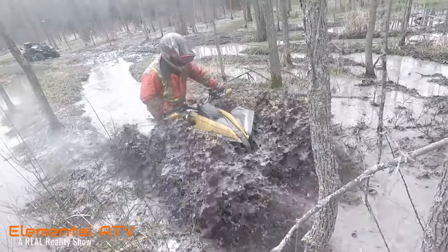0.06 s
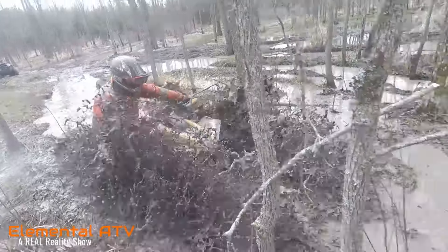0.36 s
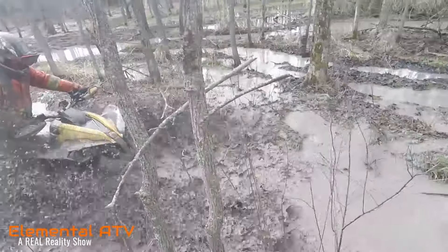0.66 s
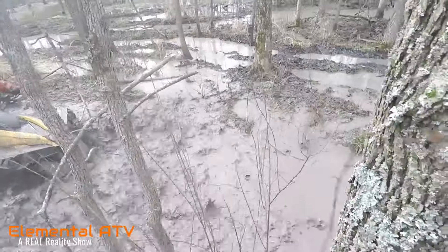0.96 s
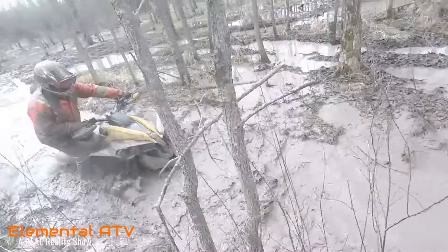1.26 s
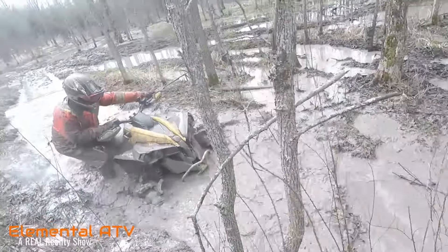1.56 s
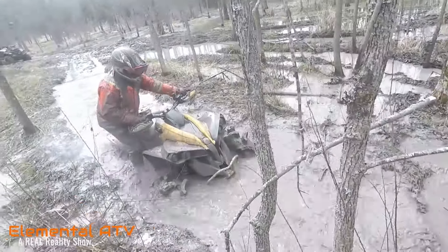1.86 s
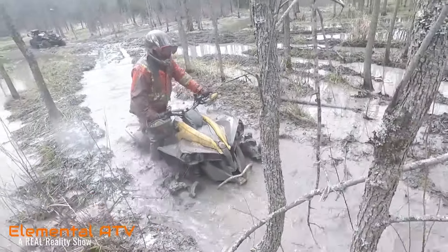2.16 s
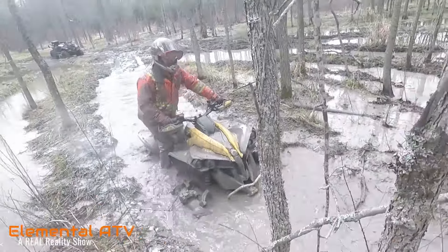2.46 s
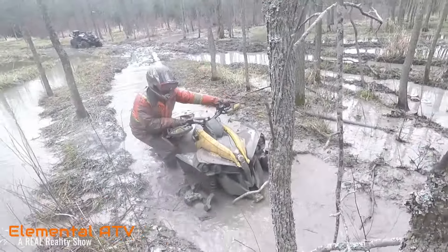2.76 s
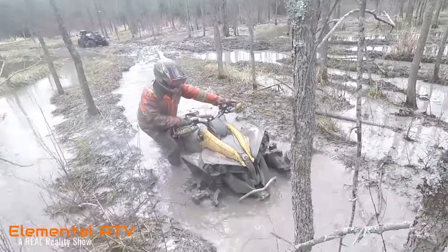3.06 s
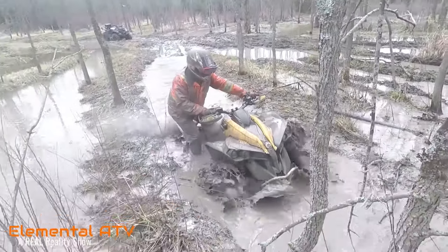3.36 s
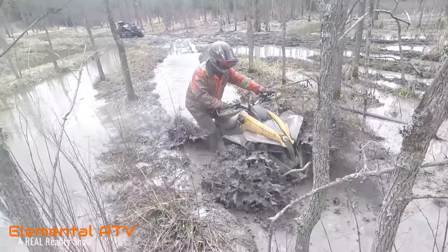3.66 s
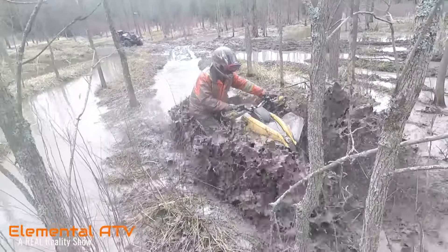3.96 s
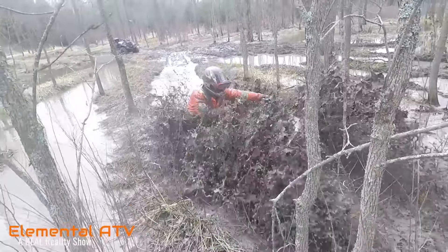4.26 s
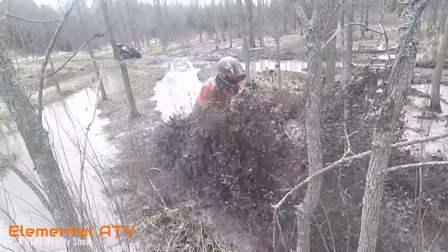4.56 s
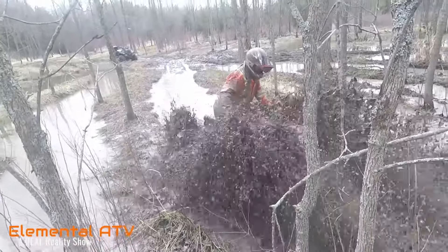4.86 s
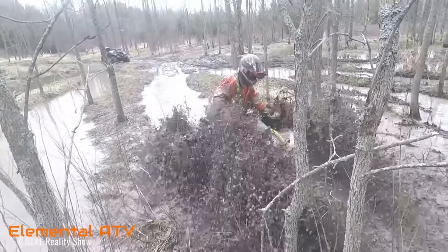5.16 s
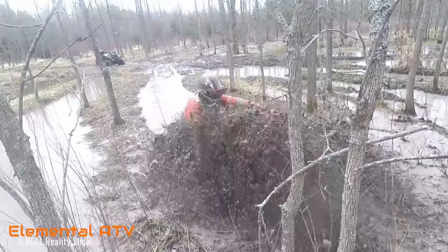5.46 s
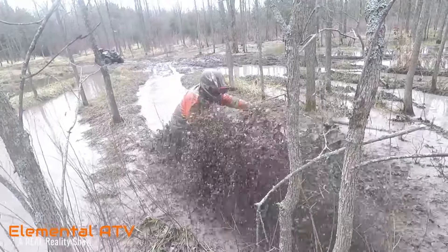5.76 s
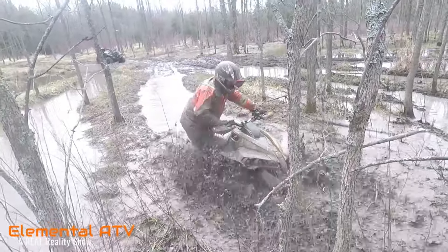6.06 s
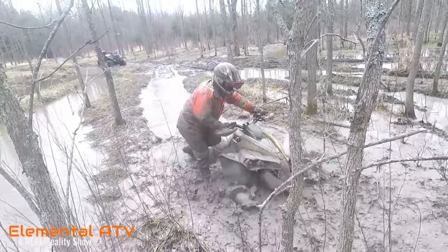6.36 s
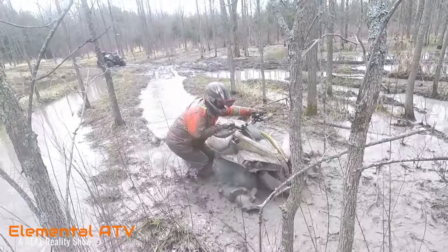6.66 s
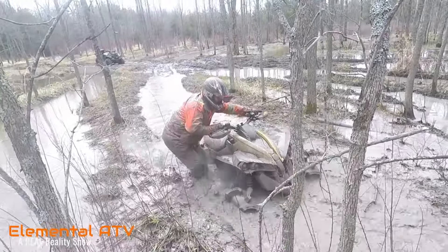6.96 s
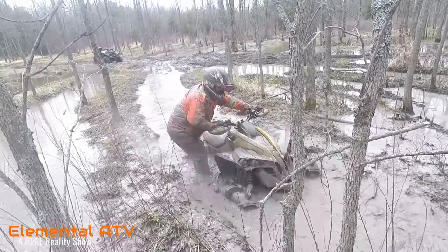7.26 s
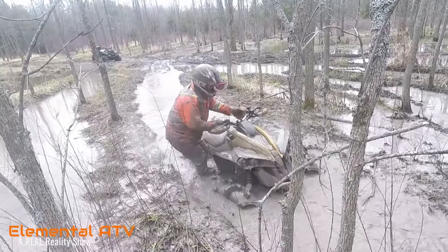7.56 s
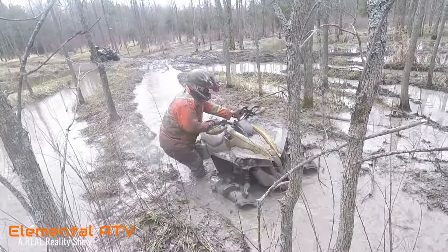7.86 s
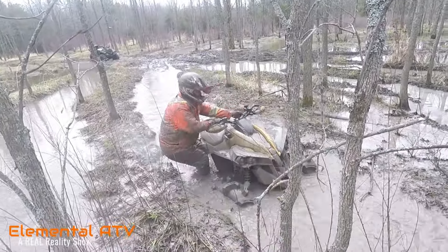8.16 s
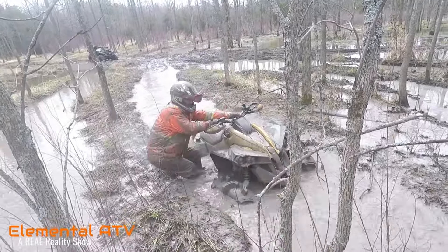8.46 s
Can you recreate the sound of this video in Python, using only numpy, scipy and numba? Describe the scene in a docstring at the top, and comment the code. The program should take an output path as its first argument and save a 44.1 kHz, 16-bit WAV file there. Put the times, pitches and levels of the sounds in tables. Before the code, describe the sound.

Heard from the edge of a mud hole in the woods, a quad's deep engine winds down amid falling spray. Another quad nearby gives a raspy rev with exhaust pops, followed by cracking twigs. The first quad roars up again and strains as its spinning tyres throw thick mud and water. The throttle shuts, the splatter dies away, something knocks on a plastic panel, and the engine chugs unevenly over trickling water.

```python
"""A V-twin quad, stuck in a mud hole in the woods, drops from a rev, idles, revs hard and idles again.
Uneven intake gulps and exhaust puffs excite the resonances of its pipes, airbox and engine cases.
Its spinning tyres fling mud and water, which patter down as countless small impacts.
A second quad close by revs, pops and runs down early on; twigs snap and something knocks on the bodywork."""
import sys
import numpy as np
from scipy import signal
from scipy.fft import rfft, irfft, next_fast_len
from scipy.io import wavfile
from scipy.ndimage import uniform_filter1d
from numba import njit

SR = 44100
rng = np.random.default_rng(int(sys.argv[2]) if len(sys.argv) > 2 else 0)


def unload_audio(sound):
    """Save the sound as a 16-bit wav file, at the path given as the first command line argument."""
    columns = np.transpose(np.atleast_2d(sound))
    # keep every value between -1 and 1, then stretch to whole-number steps
    steps = np.round(np.clip(columns, -1, 1) * 32767)
    wavfile.write(sys.argv[1], SR, steps.astype(np.int16))


N = 375291
TIME = np.arange(N) / SR

# Revs of the stuck quad, the first already under way:
# throttle opens t/s, shuts t/s, speed hangs on t/s, fast idle f/Hz, kept for t/s, settled idle f/Hz
THROTTLE_EVENTS = [(-1.5, .02, .025, 12.52, 1.475, 11.17), (3.085, 5.455, .008, 13.62, 1.092, 11.69)]
# Pipe modes of the second quad: f/Hz, bandwidth/Hz, level/dB
SECOND_PIPE_MODES = [(150, 23, -19), (242, 20, -17), (320.4, 36, 21.5), (360, 220, 14), (475, 36, -10),
                     (490, 61, 1.5)]
# Spectrum of a drop's impact or a twig's crack: f/Hz, relative level/dB
CRACK_SPECTRUM = [(500, 9), (2500, 1), (5000, 14.5), (6500, 11), (10000, 6), (15000, -11)]


def stuck_quad():
    """Source and filter: intake and exhaust pulse trains, locked to the crank, drive the resonators."""
    hz = cycle_rate()
    load, throttle, strength_db, roar_gain = effort()
    phase = np.cumsum(hz) / SR
    rough = np.minimum(12 / hz, 1) ** 0.68  # a slow crank turns unevenly
    lag_hz = 59.3 - hz  # grows as the mud drags the engine down
    gulps = firings(phase, start=.013, second=.6, scatter_db=.5, jitter_s=.0002, rough=rough)
    blows = firings(phase, start=.533, second=.51, scatter_db=3.5, jitter_s=.0016, rough=rough)
    return (pipes(gulps, blows, hz, lag_hz, load, throttle) * undb(strength_db)
            + bark(gulps, load) + strain(gulps, lag_hz, load) + gas_roar(gulps) * roar_gain
            + case_clatter(blows, roar_gain) + valve_gear(phase, gulps, rough))


def cycle_rate():
    """The four-stroke cycle rate in Hz sets the fundamental: it picks up, pulls, runs down and settles."""
    # Speed while the tyres drag in the mud, one curve a rev: t/s, cycle rate f/Hz
    loaded_speeds = [
        [(0, 51), (.045, 49.5)],
        [(3.2, 25.8), (3.45, 43.7), (3.55, 49.6), (3.65, 53.7), (3.75, 55.7), (4.2, 54), (4.62, 51.9),
         (4.77, 52.5), (5.15, 48.7), (5.45, 43.6)],
    ]
    pick_up_s, run_down_s, settle_s = .11, .55, .5
    hz = 0
    for (opens, shuts, hang_s, fast_hz, fast_s, idle_hz), pull in zip(THROTTLE_EVENTS, loaded_speeds):
        idle = fast_hz + (idle_hz - fast_hz) * ramp(shuts + hang_s + fast_s, settle_s)
        momentum = (1 - ramp(shuts + hang_s, run_down_s)) ** 1.4
        rev = idle + (curves(pull)[0] - idle) * momentum
        hz = hz + (rev - hz) * ramp(opens, pick_up_s)
    return hz


def effort():
    """Air supply governs excitation: returns load 0-1, throttle 0-1, pulse level in dB and roar gain."""
    open_s, shut_s, kick_s = .38, .056, .099
    load = starved = kick_db = surge = 0
    for opens, shuts, hang_s, *_ in THROTTLE_EVENTS:
        load += ramp(opens, open_s) * (1 - ramp(shuts, shut_s))
        starved += np.exp(-((TIME - shuts - hang_s - .51) / .35) ** 2)  # short of air while running down
        # each move of the throttle gives a few hard pulses
        kick_db += 5 * swell(opens, shut_s, 0, kick_s) + 1.5 * swell(shuts, shut_s, 0, kick_s)
        surge += swell(opens, attack_s=.3, hold_s=.052, release_s=.14)
    throttle = np.clip(.1 * (1 - starved) * (1 - load) + .46 * load, 0, 1)
    strength_db = kick_db - 6 * load - 6 * starved
    roar_gain = undb(-18) * surge + undb(-41.5) * load + undb(-42)
    return load, throttle, strength_db, roar_gain


def pipes(gulps, blows, hz, lag_hz, load, throttle):
    """Air-column resonance: the pipes ring at idle; an open throttle lets the airbox boom instead."""
    # Modes of the shut intake, the exhaust and the open airbox: f/Hz, bandwidth/Hz, level/dB
    intake_modes = [(60.26, 4.83, -15), (136.3, 42.6, -23.5), (197, 3.3, -41), (240.9, 15.7, -13),
                    (280.5, 17, -19.5), (385.2, 7.9, -13.5)]
    exhaust_modes = [(165.24, 14.2, -16.5), (174.4, 48, -16.5)]
    airbox_modes = [(56.3, 4.3, -26.5), (99.6, 20, -18), (172, 92, -10), (202.3, 34.9, -0.5),
                    (242.3, 24.8, -6), (282.9, 29.2, -14), (323, 35.5, -19)]
    idle = ring(blows, exhaust_modes, -.87) - ring(gulps, intake_modes)
    idle = lowpass(idle, np.full(N, 128.), damping=.77)
    idle = lowpass(idle, np.full(N, 203.), damping=.78)  # silencer
    boom = dull(ring(gulps, airbox_modes[3:], -1.036) - ring(gulps, airbox_modes[:3]), hz=352)
    boom_db = 59 + .13 * load * np.clip(lag_hz, 0, 8)
    opening = np.clip(throttle + .0055 * (hz - 12), 0, 1)  # a fast engine draws air past a shut throttle
    return (1 - opening) * idle * undb(65) + opening * boom * undb(boom_db)


def bark(gulps, load):
    """Impulse excitation of the upper airbox modes gives a hard bark when the throttle is open."""
    # Upper modes: f/Hz, bandwidth/Hz, level/dB
    bark_modes = [(374, 30, -16), (468, 32, -20), (616, 25, -1), (1005, 89, 3), (1160, 150, 0.5),
                  (1233, 64, 8), (1455, 330, -2.5), (2120, 1500, -16), (3670, 700, -22)]
    # Course of the bark under load: t/s, relative level/dB
    bark_levels = [(3.15, -34), (3.36, -37), (3.6, -36), (3.83, -32.5), (4.0, -37), (4.17, -42.5),
                   (4.6, -45), (5.2, -41), (5.45, -44)]
    ringing = ring(gulps + .015 * puffs(gulps, decay_s=.005), bark_modes, -1)
    gain = undb(-64) + load * undb(curves(bark_levels)[0] + 4)
    return steady(dull(ringing, hz=7000)) * gain


def strain(gulps, lag_hz, load):
    """Forced resonance: under load the pipe picks out clean, wavering overtones, louder as speed falls."""
    # Pipe modes: f/Hz, bandwidth/Hz, level/dB
    overtone_modes = [(412, 33, -3), (615, 56, 7.5), (720, 40, -22.5)]
    overtones = steady(dull(ring(gulps, overtone_modes, -1.3), hz=875))
    return overtones * load * undb(-39 + .1 * lag_hz - 2.5 * walk(3.7))


def gas_roar(gulps):
    """Flow noise: gas rushing with each gulp is filtered by two pipe resonances."""
    rush = puffs(gulps, decay_s=.072)
    return steady(dull(ring(rush, [(328, 45, 7.3), (434, 81, -2)]), hz=810))


def case_clatter(blows, roar_gain):
    """Structural resonance: the engine cases ring in step with the crank, harder at pick-up."""
    # Case modes: f/Hz, bandwidth/Hz, level/dB
    case_modes = [(1686, 91, 2), (2495, 110, -1.5), (3290, 130, -2.5), (3860, 130, -5.5)]
    return unit(ring(puffs(blows, decay_s=.0051), case_modes)) * (undb(-52.5) + .068 * roar_gain)


def valve_gear(phase, gulps, rough):
    """Impact noise: tappets tap sharply and unevenly, and the valve gear ticks with each gulp."""
    # Spectrum of a tick: f/Hz, relative level/dB
    tick_spectrum = [(1000, -44), (4500, 1.5), (6600, 7), (8000, -3), (10000, -3), (15000, -31)]
    strikes = firings(phase, start=.2, second=.56, scatter_db=5, jitter_s=.003)
    taps = colour(puffs(strikes * rough, decay_s=.0078), tick_spectrum)
    ticks = colour(puffs(gulps * rough, decay_s=.017), tick_spectrum)
    return taps * undb(-58) + ticks * undb(-55)


def second_quad():
    """Direct and scattered sound: a pipe rings and rasps; off throttle it comes mostly through trees."""
    # Engine speed: t/s, cycle rate f/Hz
    speed = [(0, 15), (.33, 26), (.45, 28.3), (.7, 28.5), (.95, 29.5), (1.6, 29.5), (2, 24), (2.7, 16.5),
             (3.2, 13)]
    # Blip, rev and run-down: start t/s, attack t/s, hold t/s, release t/s, pipe level/dB, rasp level/dB
    runs = [(.1, .25, .1, .3, -21, -42), (1.07, .09, .44, .07, -19, -26.5), (1.6, .35, .55, .7, -23.5, -47)]
    # Spectrum of the escaping gas: f/Hz, relative level/dB
    rasp_spectrum = [(200, -12), (700, -23), (1100, 0.5), (1550, 0.5), (2250, 0), (2800, -20), (5000, -10),
                     (8500, -24), (10500, -50), (15000, -63)]
    pipe_db, rasp_db = swells(runs)
    phase = np.cumsum(curves(speed)[0]) / SR
    phase -= np.interp(1.453, TIME, phase)  # one firing falls at this time
    pulses = firings(phase, start=0, second=.3, scatter_db=.7, jitter_s=.00004)
    rasp = steady(colour(puffs(pulses, decay_s=.022), rasp_spectrum))
    pipe = dull(ring(pulses, SECOND_PIPE_MODES), hz=527)
    crack = dull(ring(pulses, [(1530, 120, 0)]), hz=2170)
    muffled = dull(pipe, hz=480)
    distant = steady(muffled + 1.4 * trees(muffled, decay_s=.054))
    direct_share = np.clip((rasp_db + 46) / 17, 0, 1)
    tone = direct_share * steady(pipe + crack) + (1 - direct_share) * distant
    return tone * undb(pipe_db - 1.5) + rasp * undb(rasp_db - 1.8)


def exhaust_pops():
    """Impulse response: bangs in the second quad's exhaust pop in broad modes and thump in its pipe."""
    # Bangs: t/s, impulse level/dB
    bang_events = [(.969, -20), (1.002, -9), (1.036, -10), (1.07, -10.5), (1.099, -18), (1.133, -19),
                   (1.153, -10), (1.167, -13), (1.408, -9), (1.421, -12)]
    s, db = np.transpose(bang_events)
    bangs = clicks(s, undb(db))
    bursts = bangs + .085 * puffs(bangs, decay_s=.0033)
    pops = ring(bursts, [(404, 180, 31.4), (1250, 600, 24), (1580, 240, 25)], -1.35)
    thumps = ring(bangs, SECOND_PIPE_MODES)
    return dull(pops, hz=2210) + dull(thumps, hz=540) * undb(24.5)


def mud():
    """Superposed random impacts: tyres churn thick mud; thrown water falls as spray and single drops."""
    # Throws: start t/s, attack t/s, hold t/s, release t/s, spray level/dB, churn level/dB
    throws = [(-.15, 0.61, 0.18, 0.12, -36.5, -28), (.55, 0.23, 0.069, 0.16, -32.5, -25),
              (.93, 0.019, 0.67, 0.16, -50, -26), (2.26, 0.031, 0.18, 0.13, -46, -34),
              (2.58, 0.013, 0.0063, 0.023, -37.5, -31.5), (3.08, 0.027, 0.37, 0.082, -38, -29.5),
              (3.15, 0.6, 0.12, 0.26, -44, -28.5), (4.0, 0.85, 1.47, 0.27, -36.5, -29.5),
              (5.8, 0.26, 0.14, 0.22, -33, -26), (6.3, 0.26, 0.38, 0.34, -50.5, -36.5)]
    # Spectra of fine spray and thick mud: f/Hz, relative level/dB
    spray_spectrum = [(1200, -27), (2200, -9), (2550, 3.5), (2900, -9), (3600, 0.5), (3950, 4), (4400, 1),
                      (6300, 1.5), (7500, -17), (9200, -13), (11200, -34), (13000, -17.5), (15500, -32.5)]
    churn_spectrum = [(30, 4), (250, 10.5), (500, -3), (750, -10.5), (1050, -2.5), (1300, -0.5), (1700, -1),
                      (2150, -9.5), (2600, -9.5), (2900, -11.5), (4000, -12), (8000, -30.5), (15000, -53)]
    trickle_spray_db, trickle_churn_db = -52.5, -37  # water never stops running off the quad
    spray_db, churn_db = swells(throws)
    spray = colour(patter(count=24000, spread_db=6, decay_s=.01), spray_spectrum)
    churn = colour(patter(count=9000, spread_db=-6.5, decay_s=.017), churn_spectrum)
    drips = colour(patter(count=260, spread_db=3.5, decay_s=.001), CRACK_SPECTRUM)
    spray_gain = np.hypot(undb(spray_db - .74 + .1 * walk(54)), undb(trickle_spray_db))
    churn_gain = np.hypot(undb(churn_db + 1.23 * walk(6.2)), undb(trickle_churn_db))
    return spray * spray_gain + churn * churn_gain + drips * undb(-66)


def twigs():
    """Brittle fracture: dry twigs give broadband cracks that scatter among the trees."""
    # Fractures: t/s, relative level/dB
    fractures = [(2.1317, -17), (2.143, -35), (2.2541, -26), (2.3152, -20.5), (2.3287, -22.5),
                 (2.424, -26.5), (2.496, -25), (2.6015, -45), (3.114, -23.5)]
    s, db = np.transpose(fractures)
    snaps = colour(puffs(clicks(s, undb(db)), decay_s=.001), CRACK_SPECTRUM)
    snaps = snaps + .89 * trees(snaps, decay_s=.013)
    return snaps / np.abs(snaps).max() * undb(db.max() + 1)


def bodywork_knocks():
    """Damped plate vibration: a struck plastic panel rings briefly."""
    # Knocks: t/s, impulse level/dB
    knocks = [(6.563, -5), (7.75, -28)]
    # Panel modes: f/Hz, bandwidth/Hz, level/dB
    panel_modes = [(1900, 350, -6), (2560, 110, 2), (3150, 250, -11)]
    s, db = np.transpose(knocks)
    blows = clicks(s, undb(db))
    return undb(29) * dull(ring(blows + .03 * puffs(blows, decay_s=.003), panel_modes), hz=3200)


def trees(x, decay_s):
    """Reverberation: trunks and water scatter the sound into a short exponential tail."""
    t = TIME[:SR // 3]
    tail = rng.standard_normal(len(t)) * np.exp(-t / decay_s)
    return signal.fftconvolve(x, tail / np.sqrt(np.sum(tail ** 2)))[:N]


def firings(phase, start, second, scatter_db, jitter_s, rough=1):
    """Uneven pulse train: each cycle a pulse of size `second` follows the first by the gap of the V."""
    gap_cycles = .37
    out = 0
    for offset, size in ((0, 1), (gap_cycles, second)):
        chance = np.clip(rng.standard_normal((400, 2)), -1.5, 1.5)
        cycles = np.arange(np.floor(phase[0]), phase[-1] - start - offset)
        times = np.interp(cycles + start + offset, phase, TIME)
        timing, strength = chance[:len(times)].T * np.interp(times, TIME, rough * np.ones(N))
        out = out + clicks(times + jitter_s * timing, size * undb(scatter_db * strength))
    return out


def patter(count, spread_db, decay_s):
    """Shot noise: splats at random times, a few larger (or smaller, if the spread is negative)."""
    sizes = undb(spread_db * np.minimum(rng.exponential(size=count), 3))
    return unit(puffs(clicks(rng.uniform(0, N / SR, count), sizes), decay_s))


def clicks(times, sizes):
    """Impulses, shared linearly between neighbouring samples."""
    out, at = np.zeros(N), np.clip(times * SR, 0, N - 2)
    i = at.astype(int)
    np.add.at(out, i, sizes * (1 - at + i))
    np.add.at(out, i + 1, sizes * (at - i))
    return out


def puffs(pulses, decay_s):
    """Exponential decay of a noise burst after each pulse."""
    envelope = signal.lfilter([1], [1, -np.exp(-1 / (decay_s * SR))], pulses + 1e-18)
    return envelope * rng.standard_normal(N)


def ring(x, modes, ratio=1):
    """Modal sum of (f/Hz, bandwidth/Hz, level/dB) rows; mode k is also weighted by ratio ** k."""
    return sum(ratio ** k * undb(db) * signal.lfilter(*signal.iirpeak(hz, hz / width, SR), x + 1e-18)
               for k, (hz, width, db) in enumerate(modes))


def colour(x, points):
    """Spectral shaping by (f/Hz, level/dB) points; rms 1."""
    hz, db = np.transpose(points)
    size = next_fast_len(N + 4096)
    f = np.maximum(np.fft.rfftfreq(size, 1 / SR), 1)
    gain = undb(np.interp(np.log(f), np.log(hz), db))
    return unit(irfft(rfft(x, size) * gain, size)[:N])


@njit
def lowpass(x, hz, damping):
    """Two-pole state-variable low-pass with a corner given for each sample."""
    y, band, low = np.empty(len(x)), 0., 0.
    for i in range(len(x)):
        g = np.tan(np.pi * hz[i] / SR)
        v = (band + g * (x[i] + 1e-18 - low)) / (1 + g * (g + damping))
        y[i] = low + g * v
        band, low = 2 * v - band, 2 * y[i] - low
    return y


def dull(x, hz):
    """Fourth-order low-pass."""
    return signal.sosfilt(signal.butter(4, hz, fs=SR, output="sos"), x)


def steady(x):
    """Division by the running rms holds the level near 1 over a quarter of a second."""
    return x / np.sqrt(uniform_filter1d(uniform_filter1d(x * x, SR // 4), SR // 8) + 1e-12)


def walk(rate_hz):
    """Slow random fluctuation: smoothed noise of rms 1."""
    k = int(SR / rate_hz)
    return unit(uniform_filter1d(uniform_filter1d(rng.standard_normal(N), k), k))


def curves(table):
    """Linear interpolation of each column against the first, t/s."""
    s, *columns = np.transpose(table)
    return [np.interp(TIME, s, c) for c in columns]


def ramp(start_s, length_s):
    """Linear rise from 0 to 1."""
    return np.clip((TIME - start_s) / length_s, 0, 1)


def swell(start_s, attack_s, hold_s, release_s):
    """Envelope with linear attack, hold and exponential release."""
    released_s = np.maximum(TIME - start_s - attack_s - hold_s, 0)
    return ramp(start_s, attack_s) * np.exp(-released_s / release_s)


def swells(table):
    """Incoherent addition: overlapping swells sum in power; one dB curve for each level column."""
    power = sum(np.outer(undb(row[4:]), swell(*row[:4])) ** 2 for row in table)
    return 10 * np.log10(power + 1e-12)


def unit(x):
    """Normalisation to rms 1."""
    return x / np.sqrt(np.mean(x ** 2))


def undb(db):
    """Decibels to amplitude ratio."""
    return 10 ** (np.asarray(db) / 20)


def scene():
    """Superposition of all sources, as heard from the bank."""
    return (stuck_quad() + second_quad() + exhaust_pops() + mud() + twigs() + bodywork_knocks())[None]


def record(dry):
    """Band limiting and soft saturation thin the deepest bass, round the peaks and cut the top."""
    bass_hz, top_hz, ceiling = 22, 15500, 1.02
    thinned = signal.sosfilt(signal.butter(1, bass_hz, "high", fs=SR, output="sos"), dry)
    rounded = thinned / (1 + (thinned / ceiling) ** 10) ** (1 / 10)
    return signal.sosfilt(signal.ellip(8, .2, 70, top_hz, fs=SR, output="sos"), rounded)


dry = scene()
out = record(dry)
unload_audio(out)
```